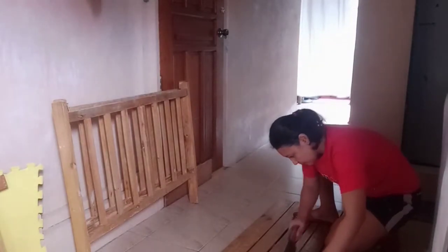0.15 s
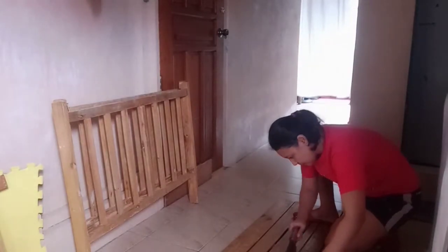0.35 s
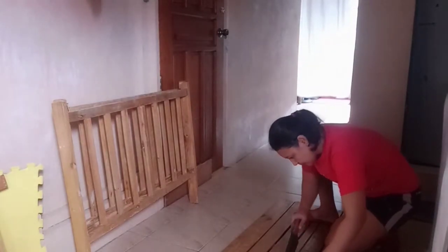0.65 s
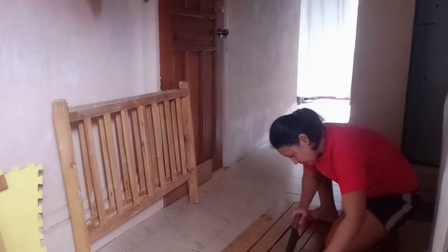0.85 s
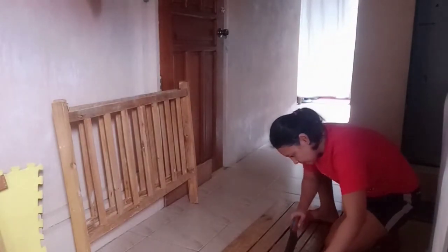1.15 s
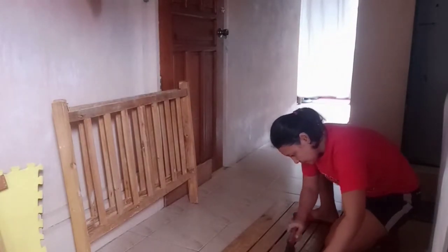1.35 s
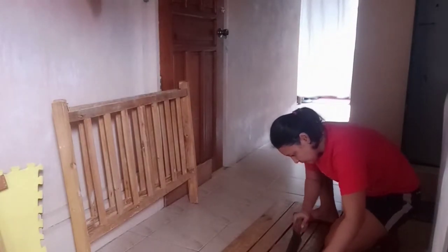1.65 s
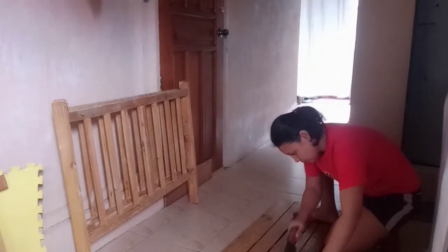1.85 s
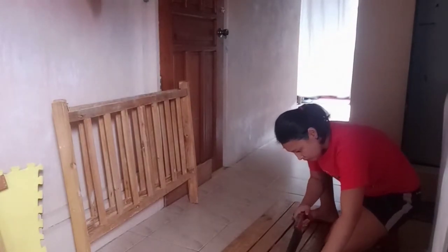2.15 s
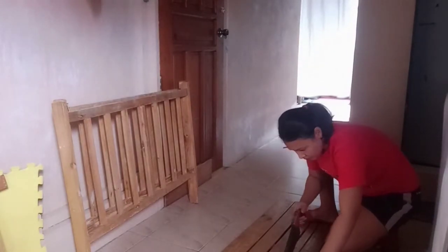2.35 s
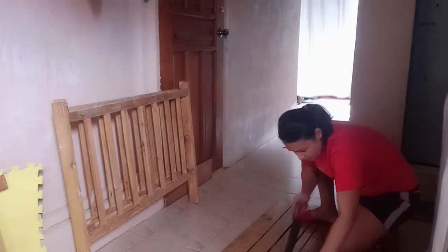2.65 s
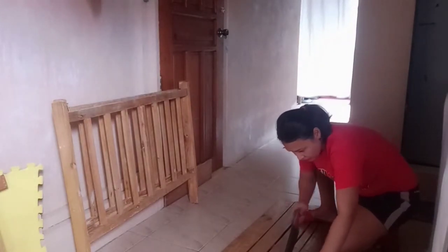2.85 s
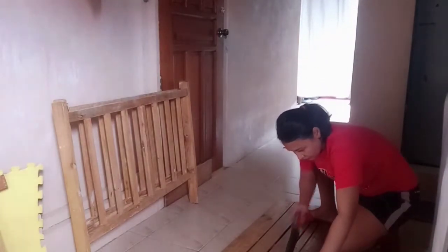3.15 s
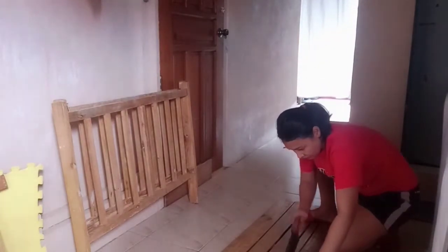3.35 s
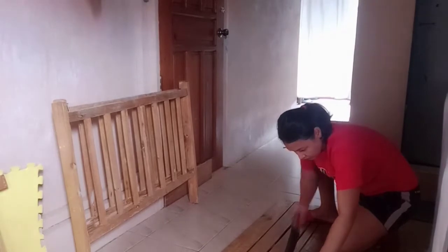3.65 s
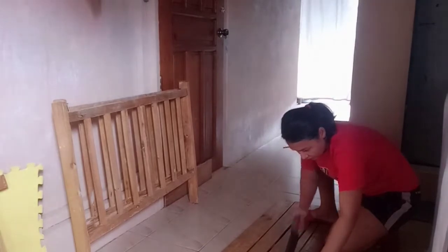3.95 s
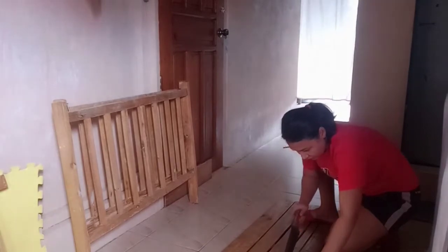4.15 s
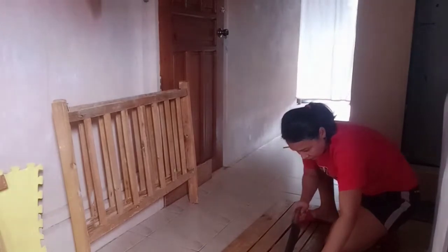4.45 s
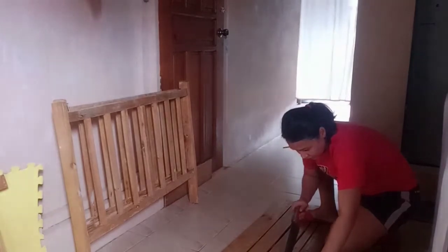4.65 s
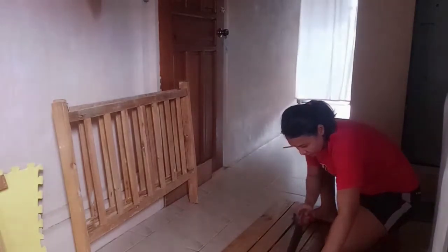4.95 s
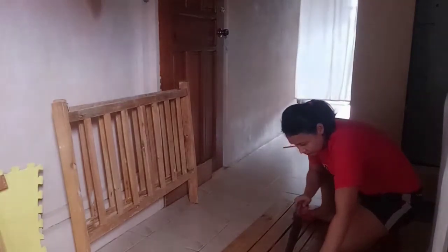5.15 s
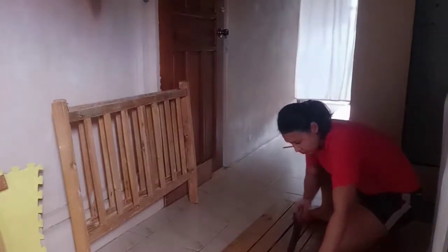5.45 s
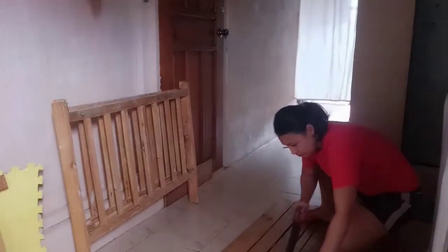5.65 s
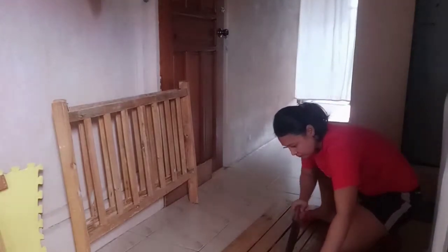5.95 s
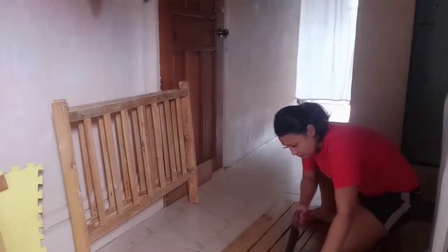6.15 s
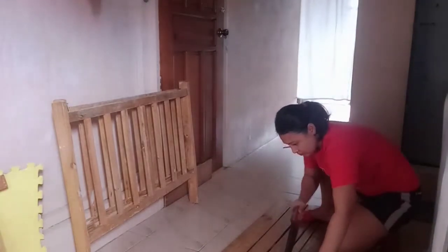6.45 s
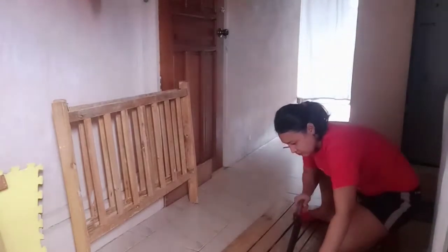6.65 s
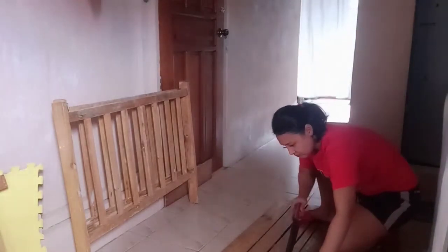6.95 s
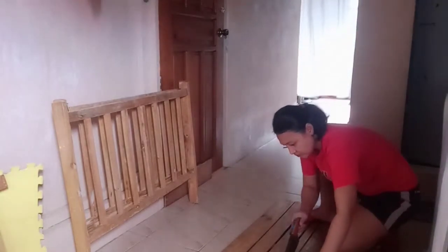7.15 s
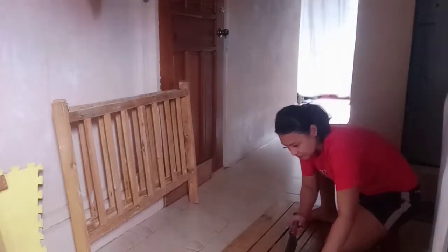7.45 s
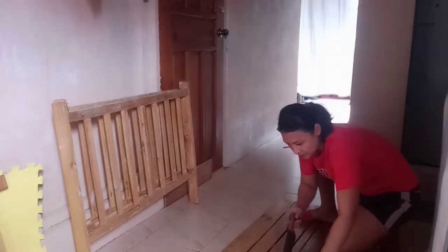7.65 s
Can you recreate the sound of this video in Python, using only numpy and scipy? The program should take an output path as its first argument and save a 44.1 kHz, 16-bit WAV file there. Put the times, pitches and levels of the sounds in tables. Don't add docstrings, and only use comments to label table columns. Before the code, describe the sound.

A hand saw rasps through wooden slats in quick back-and-forth strokes, with short near-silent pauses, in a bare hallway a few steps away.

```python
import sys
import numpy as np
from scipy import signal
from scipy.io import wavfile
from scipy.ndimage import uniform_filter1d

SR = 44100
rng = np.random.default_rng(int(sys.argv[2]) if len(sys.argv) > 2 else 0)


def attenuation_scalar(level_db):
    decades = np.asarray(level_db, float) / 20
    return 10 ** decades


def waveform_to_disk(signal):
    frames = np.transpose(np.atleast_2d(signal))
    scaled = np.clip(frames, -1, 1) * 32767
    samples = np.round(scaled).astype(np.int16)
    wavfile.write(sys.argv[1], SR, samples)


N = 343978


def evened(x):
    return x / np.sqrt(np.mean(x ** 2) + 1e-20)


def read(points, hz):
    f, value = np.transpose(points)
    return np.interp(np.log(hz + 1), np.log(f + 1), value)


def coloured(x, shape, modes=(), size=8192):
    hz = abs(np.fft.fftfreq(size, 1 / SR))
    db = read(shape, hz)
    for mode_hz, width_hz, lift_db in modes:
        db = db + lift_db / (1 + (2 * (hz - mode_hz) / width_hz) ** 2)
    log_gain = np.maximum(db, -100) * np.log(10) / 20
    taps = np.fft.ifft(np.exp(np.conj(signal.hilbert(log_gain)))).real[:size // 2]
    return evened(signal.oaconvolve(x, taps)[:N])


def wander(hz):
    span = int(SR / hz)
    return evened(uniform_filter1d(uniform_filter1d(rng.standard_normal(N), span), span))


def blotches(shape, bins, frames):
    field = rng.standard_normal(shape[::-1]).T
    return evened(uniform_filter1d(uniform_filter1d(field, bins, axis=0), frames, axis=1))


def patchy(x, depth_db, bins, frames):
    z = signal.stft(x, nperseg=512)[2]
    z = z * attenuation_scalar(depth_db * blotches(z.shape, bins, frames))
    return evened(signal.istft(z, nperseg=512)[1][:N])


def grit(per_s, spread_db):
    size = attenuation_scalar(spread_db * np.minimum(rng.exponential(1, N), 4)) * rng.choice([-1., 1.], N)
    return evened(size * (rng.random(N) < per_s / SR))


# start_s, length_s, bite_db,
# scrape_re_bite_db, pile_re_bite_db
PUSHES = [(-0.038, 0.21, -20, -8, -14), (0.276, 0.21, -24.5, -6.5, -7), (0.622, 0.18, -21.5, -8, -9),
          (0.922, 0.21, -20.5, -9.5, -11), (1.247, 0.2, -22, -9, -7), (1.686, 0.15, -21.5, -5.5, -6.5),
          (2.651, 0.19, -23.5, -2.5, -7.5), (2.968, 0.18, -20.5, -6, -12), (3.3, 0.17, -23.5, -3, -9),
          (3.637, 0.17, -21.5, -5.5, -11), (3.929, 0.19, -24, -3.5, -7.5), (4.225, 0.18, -24, -4, -6),
          (5.442, 0.18, -24, -3.5, -13), (5.727, 0.15, -28, -1.5, -6.5), (6.02, 0.14, -26, -2, -9),
          (6.678, 0.2, -23, -3.5, -14.5), (7.022, 0.17, -22.5, 0.5, -14.5), (7.14, 0.16, -32, 6, -23.5)]
PULLS = [(0.131, 0.165, -23, -6, -12.5), (0.444, 0.19, -29.5, -3.5, -7.5), (0.772, 0.18, -27.0, -5, -7.5),
         (1.081, 0.16, -27.5, -4, -6.5), (1.413, 0.2, -28.5, -4, -2.5), (1.828, 0.19, -31, -2.5, -8.5),
         (2.823, 0.16, -27, -2.5, -11), (3.125, 0.21, -25.5, -5.0, -11.5), (3.466, 0.24, -31, -0.4, -8),
         (3.781, 0.17, -30.5, -3, -5.5), (4.098, 0.159, -29, -3, -7.5), (4.377, 0.2, -33.5, -0.5, -8),
         (5.599, 0.16, -34, -2, -10.5), (5.888, 0.17, -35.5, 0, -7.9), (6.144, 0.16, -34, 0.6, -4.7),
         (6.865, 0.21, -33, 1.3, -14)]
DRAGS = [(1.588, 0.1, -43, 2.5, -11), (2.136, .13, -56, 2, -16), (2.257, .11, -62.5, 2.5, -14),
         (2.407, 0.12, -65.5, 1, 1), (2.448, .22, -43, -0.5, -9.5), (4.689, 0.17, -58.5, 8.5, -26),
         (4.905, 0.14, -47.5, 4.5, -8), (5.036, 0.2, -44.5, 2, -10.5), (6.238, .15, -44.5, 0, -13),
         (6.436, 0.091, -71, 5.5, -6), (6.499, .22, -39, -2, -19), (7.42, 0.31, -65, -14, -8.5),
         (7.744, .145, -74, 15, -8)]
START_S, LENGTH_S, BITE_DB, SCRAPE_DB, PILE_DB = np.vstack([PUSHES, PULLS, DRAGS]).T
PILE_FADE_DB_PER_S = 481


def by_kind(push, pull, drag):
    return np.repeat([push, pull, drag], [len(PUSHES), len(PULLS), len(DRAGS)])


def swell_db(level_db, crest, point, fade_db_per_s=240, drag_fade_db_per_s=520):
    t = np.arange(0, N, 32) / SR
    along = np.clip((t - START_S[:, None]) / LENGTH_S[:, None], 0, 1)
    bend = np.log(.5) / np.log(np.clip(crest, .1, .9)).reshape(-1, 1)
    arches = attenuation_scalar(level_db)[:, None] * abs(np.sin(np.pi * along ** bend)) ** np.reshape(point, (-1, 1))
    strokes, drags = np.split(arches, [-len(DRAGS)])
    db = 20 * np.log10([strokes.sum(0) + 1e-5, drags.sum(0) + 1e-5])
    fall_db = np.outer([fade_db_per_s, drag_fade_db_per_s], t)
    held_db = np.maximum.accumulate(db + fall_db, axis=1) - fall_db
    return np.interp(np.arange(N) / SR, t, held_db.max(0))


def wood_crest():
    return by_kind(.45, .43, .6)


def wood_point():
    return by_kind(1.67, 1.67, 2.6)


def steel_crest():
    return by_kind(0.34, 0.4, 0.41)


def teeth(bite_db):
    teeth_hz = np.clip(190 + 4.0 * (bite_db + 24.5), 60, 400) * attenuation_scalar(1.6 * wander(90))
    passes = np.cumsum(teeth_hz) / SR
    size_db = 1.5 * np.clip(rng.standard_normal(N), -2, 2)
    knocks = np.diff(np.floor(passes), prepend=0) * attenuation_scalar(size_db)
    blows = 0.41 * evened(knocks) + 1.2 * grit(3000, 1.8)
    puff = np.exp(-(passes % 1) / .35)
    return blows, puff


# freq_hz, density_db_per_hz
SLAT = [(150, -78.5), (350, -26.5), (520, -5), (714, -2.5), (1080, -3), (1390, -5), (1700, -4), (2300, -27),
        (3700, -100)]
# freq_hz, width_hz, lift_db
SLAT_MODES = [(702.7, 37, 6), (856, 70, 4.5), (989, 47, 6), (1099, 27, 9), (1340, 120, -2.5)]


def slat(blows, bite_db):
    return attenuation_scalar(bite_db + 1.04) * patchy(coloured(blows, SLAT, SLAT_MODES), depth_db=1.5, bins=4, frames=9)


# freq_hz, density_db_per_hz
PILE = [(40, -73.5), (90, -25), (140, -6), (242, -7.5), (279, -.5), (318, -5), (367, 0.5), (580, -7),
        (750, -28), (1280, -100)]
# freq_hz, width_hz, lift_db
PILE_MODES = [(280.6, 16, 6.3), (393.5, 27, 5.4), (476, 50, 1.4)]


def pile(blows):
    level_db = swell_db(BITE_DB + PILE_DB, wood_crest(), wood_point(), PILE_FADE_DB_PER_S)
    thud = coloured(blows, PILE, PILE_MODES)
    return attenuation_scalar(level_db + 2.0) * patchy(thud, depth_db=2.5, bins=2, frames=12)


# freq_hz, density_db_per_hz
BLADE = [(400, -83.5), (900, -22.5), (1300, -7.5), (2130, -4), (2400, -4), (2790, -6.5), (3460, -3.5),
         (4100, -8.5), (4800, -16), (8000, -58.5)]
# freq_hz, width_hz, lift_db
BLADE_MODES = [(1504, 44, 11.9), (1776, 19, 13.5), (1940, 32, 8.5), (2280, 45, 2.2), (2360, 17, 6.7),
               (2437, 81, 4.8), (2710, 12, 1.8), (3450, 12, 8.3), (3400, 14, 1.1), (3680, 39, 5.3),
               (3833, 100, 4.15)]


def blade(puff):
    level_db = swell_db(BITE_DB + SCRAPE_DB, steel_crest(), by_kind(1.51, 1.51, 1.83))
    scrape = coloured((2.7 + .5 * puff) * grit(6000, 2.5), BLADE, BLADE_MODES)
    return attenuation_scalar(level_db + 0.85) * patchy(scrape, depth_db=0.5, bins=5, frames=12)


# freq_hz, density_db_per_hz
RASP = [(1500, -69), (3000, -14), (4200, 0), (4920, 0.5), (7420, -1.5), (8230, -5), (9220, -17.5),
        (11300, -14.5), (12000, -12.5), (13000, -4), (14000, -4), (14800, 3), (15600, -3.5)]
# freq_hz, width_hz, lift_db
RASP_MODES = [(5600, 190, 3.3), (6180, 60, 4.9), (6650, 92, 4.9), (7490, 270, 4.6), (10240, 50, 6.5),
              (15201, 25, 8)]


def fibres(puff):
    level_db = BITE_DB + by_kind(-6, -6, -5.5) + 1.36 * SCRAPE_DB
    level_db = swell_db(level_db, 0.94 * steel_crest(), 1.4)
    rasp = coloured((1.0 + .5 * puff) * grit(12000, 3.7), RASP, RASP_MODES)
    return attenuation_scalar(level_db + 1.92) * patchy(rasp, depth_db=1.5, bins=12, frames=8)


# at_s, jump_db
LEVEL_JUMPS = [(0.638, -2.5), (.661, 3.5), (.957, 8.5), (1.289, 2), (1.697, 9), (2.475, 5), (2.657, 6.5),
               (2.991, 2), (3.317, 7.5), (3.555, 9.5), (3.65, 12), (4.268, 0), (4.711, 6.5), (4.918, 0),
               (5.451, -5), (5.751, 6), (6.038, -1), (6.695, -6), (6.992, 17), (7.04, 8.5), (7.076, 13),
               (7.181, 12.5), (7.752, 11)]


def jumps_db():
    t, db = np.arange(N) / SR, np.zeros(N)
    for at_s, jump_db in LEVEL_JUMPS:
        db += .5 * jump_db * np.sign(t - at_s) * np.exp(-abs(t - at_s) / 0.0079)
    return db


# freq_hz, t60_s
HALL = [(200, 0.13), (1000, 0.2), (4000, 0.32), (12000, 0.13)]


def hall(x, wet_db):
    taps = np.zeros(SR // 2)
    at = np.arange(130, len(taps) - 20, 20)
    taps[at + rng.integers(0, 20, len(at))] = rng.choice([-1., 1.], len(at))
    hz, t, z = signal.stft(taps, SR, nperseg=256)
    tail = signal.istft(z * attenuation_scalar(-60 * t / read(HALL, hz)[:, None]), SR, nperseg=256)[1]
    return x + attenuation_scalar(wet_db) * signal.oaconvolve(x, tail / np.linalg.norm(tail))[:N]


def saw():
    bite_db = swell_db(BITE_DB, wood_crest(), wood_point())
    blows, puff = teeth(bite_db)
    contact = slat(blows, bite_db) + pile(blows) + blade(puff) + fibres(puff)
    judder_db = 0.73 * wander(32)
    return hall(attenuation_scalar(judder_db + jumps_db()) * contact, wet_db=-13.0)


# at_s, level_db
DRAUGHT = [
    (0.0, -42),
    (0.06, -53.5),
    (0.09, -33.5),
    (0.35, -57.5),
    (1.74, -30.5),
    (2.42, -47),
    (2.67, -29),
    (2.83, -52),
    (3.62, -53),
]
# freq_hz, density_db_per_hz
DRAUGHT_COLOUR = [(12, -57), (20, -35.5), (91, 4.5), (147, -2), (211, -8), (296, -47), (336, -56.5),
                  (400, -55.5), (520, -77), (880, -120)]
# start_s, peak_db, pitch_hz
BUFFETS = [(1.335, -22, 101.7), (1.411, -19, 165), (1.565, -18, 148), (1.604, -19.5, 110.7),
           (1.673, -18.5, 116), (1.791, -19, 143.4), (1.84, -33, 84.3), (1.985, -28, 96),
           (1.999, -19.5, 114), (2.056, -24.5, 186), (2.083, -25.5, 117), (2.104, -29, 100),
           (2.142, -31, 125), (2.283, -31, 82.6), (2.37, -32, 114), (2.483, -31, 112.2), (2.516, -28, 84.8),
           (2.558, -33, 102), (2.584, -28, 129), (2.647, -16, 113)]


def draught():
    at_s, level_db = np.transpose(DRAUGHT)
    wind_db = np.interp(np.arange(N) / SR, at_s, level_db, right=-81) - 2
    shake_db = -48.5 + 0.86 * (BITE_DB + PILE_DB + 34) - 1.1 * (SCRAPE_DB + 4)
    shake_db = swell_db(shake_db, 0.59, 3.5, PILE_FADE_DB_PER_S)
    air = coloured(rng.standard_normal(N) * attenuation_scalar(2.4 * wander(25)), DRAUGHT_COLOUR)
    out = np.hypot(attenuation_scalar(wind_db), attenuation_scalar(shake_db)) * air
    for start_s, peak_db, pitch_hz in BUFFETS:
        turns = np.arange(int(3 * SR / pitch_hz)) * pitch_hz / SR
        push = np.sin(2 * np.pi * turns) * np.exp(-((turns - 1.2) / 0.62) ** 2)
        out[round(start_s * SR):][:len(push)] += attenuation_scalar(peak_db) * push
    return out


# freq_hz, density_db_per_hz
FLOOR = [(30, -28.5), (80, -24), (150, -6), (450, -14.5), (950, -16.5), (1300, -15), (2500, -22.5),
         (5070, -37), (6680, -18), (9240, -49), (15600, -57)]
# freq_hz, width_hz, lift_db
FLOOR_MODES = [(2190, 40, 0.5), (3800, 60, 10.5), (6550, 60, 14.5), (6800, 150, 2.5)]


def floor():
    hiss = coloured(rng.standard_normal(N), FLOOR, FLOOR_MODES)
    return attenuation_scalar(-68) * patchy(hiss, depth_db=1.0, bins=4, frames=14)


# start_s, end_s, pitch_hz, level_db
RINGS = [(1.989, 2.503, 2280, -73), (2.303, 2.48, 2180, -68), (4.57, 4.729, 2260, -67),
         (4.608, 4.896, 656, -71.5), (4.92, 4.964, 2640, -48), (4.951, 5.07, 1280, -49),
         (5.247, 5.454, 2190, -78), (5.311, 5.443, 6550, -80.5), (6.364, 6.517, 2240, -81),
         (7.31, 7.502, 3800, -69.5), (7.443, 7.5, 6380, -66.5), (7.559, 7.751, 6800, -77),
         (7.044, 7.201, 3513, -31.5)]


def rings():
    out = np.zeros(N)
    for start_s, end_s, pitch_hz, level_db in RINGS:
        t = np.arange(start_s, end_s, 1 / SR)
        sway = uniform_filter1d(rng.standard_normal((2, SR)), 1500, axis=1)[:, :len(t)]
        phase = 2 * np.pi * pitch_hz * t
        tone = (0.07 + sway[0]) * np.cos(phase) + sway[1] * np.sin(phase)
        swell = signal.windows.tukey(len(t), .4)
        out[round(start_s * SR):][:len(t)] += attenuation_scalar(level_db) * evened(tone) * swell
    return out


def scene():
    mono = saw() + draught() + floor() + rings()
    return np.array([mono, mono])


def low_pass(x):
    return signal.sosfilt(signal.butter(12, 15830, fs=SR, output="sos"), x)


# freq_hz, side_re_mid_db
SIDE_DB = [(60, -74), (180, 0), (550, -12.5), (1650, -17.5), (4970, -13), (15000, -9)]


def record(dry):
    hz, t, z = signal.stft(dry[0], SR, nperseg=512)
    level_db = 10 * np.log10((abs(z[hz > 400]) ** 2).sum(0) + 1e-12)
    quiet = np.clip((-40 - level_db) / 22, 0, 1)
    soft = np.clip((-23 - level_db) / 20, 0, 1)
    streaks = blotches(z.shape, bins=2, frames=18)
    blocks = blotches(z.shape, bins=14, frames=8)
    reach = np.clip((hz[:, None] - 450) / 500, 0, 1)
    top = np.clip((hz[:, None] - 7500) / 1500, 0, 1)
    gain_db = quiet * reach * (4.7 * streaks + 1.5 * blocks - 2.0) - 2.7 * top * soft
    z = z * attenuation_scalar(gain_db) * (hz[:, None] < 15500)
    moments = blocks[9] > .8
    turn = rng.standard_normal(z.shape[::-1]).T
    side = z * moments * np.exp(2j * turn) * attenuation_scalar(read(SIDE_DB, hz) - 15)[:, None]
    side = signal.istft(side, nperseg=512)[1][:N]
    mid = 0.46 * np.tanh(signal.istft(z, nperseg=512)[1][:N] / 0.44)
    return low_pass(np.array([mid + side, mid - side]))


dry = scene()
out = record(dry)
waveform_to_disk(out)
```